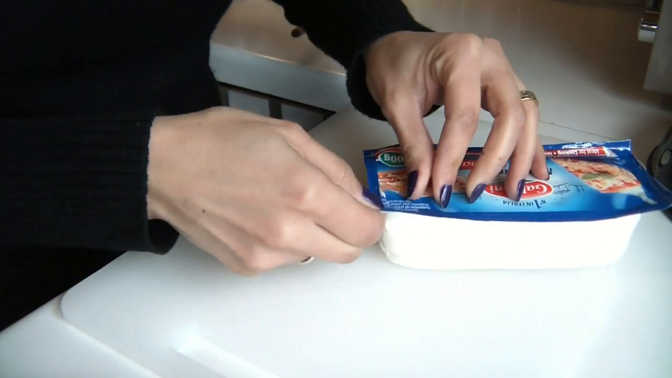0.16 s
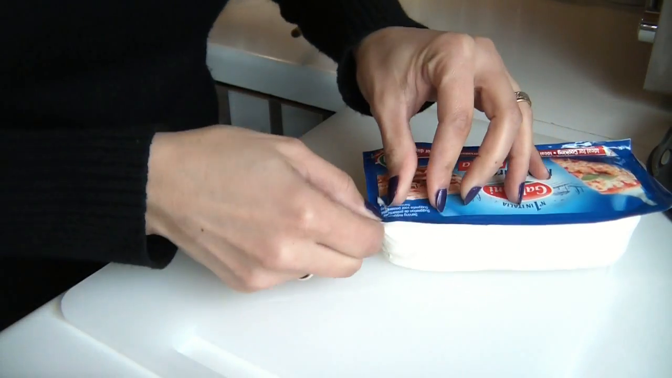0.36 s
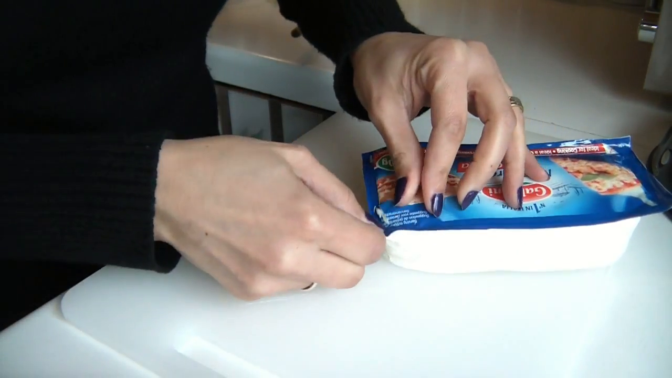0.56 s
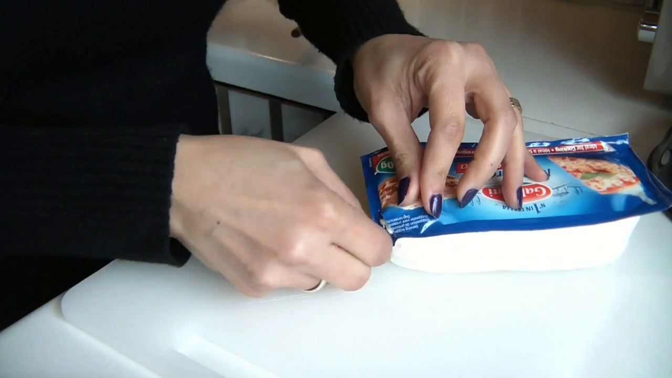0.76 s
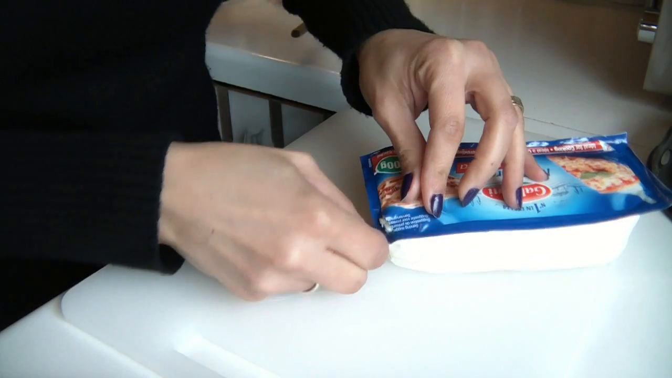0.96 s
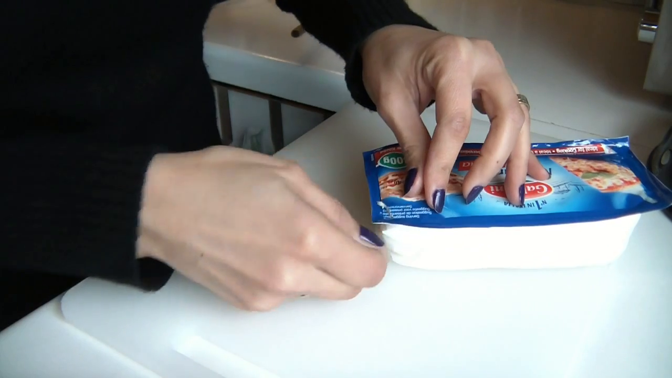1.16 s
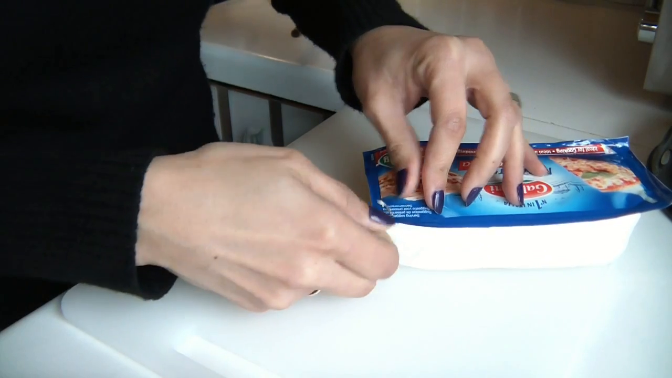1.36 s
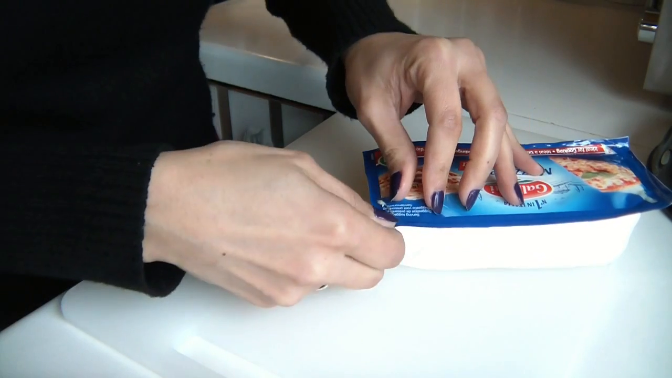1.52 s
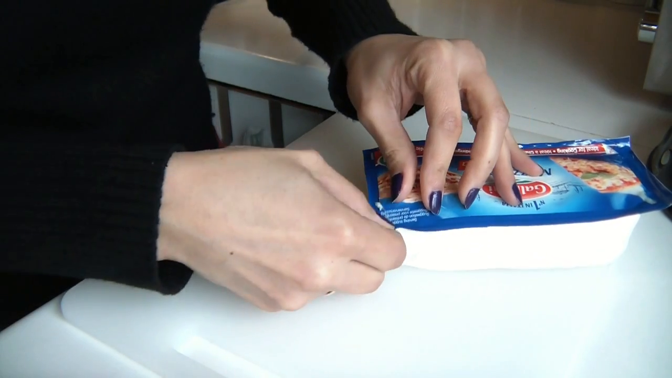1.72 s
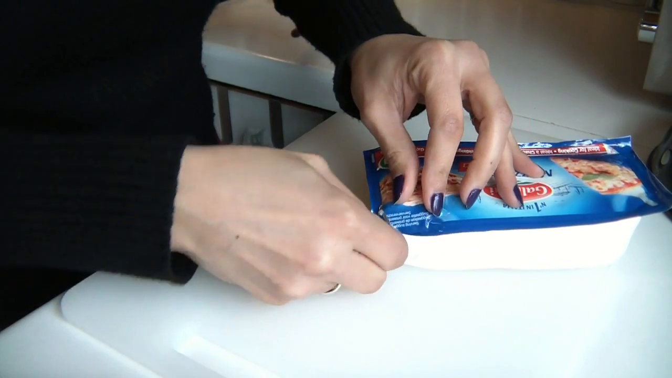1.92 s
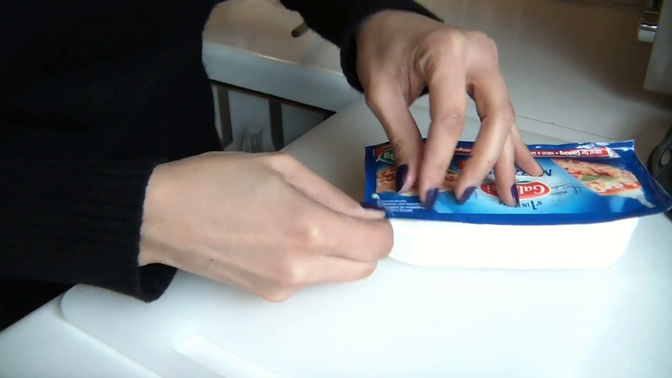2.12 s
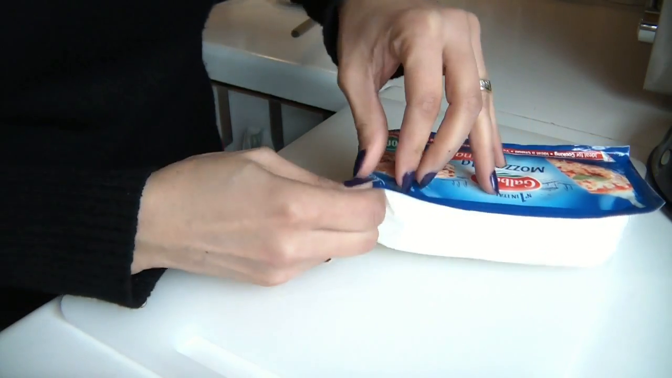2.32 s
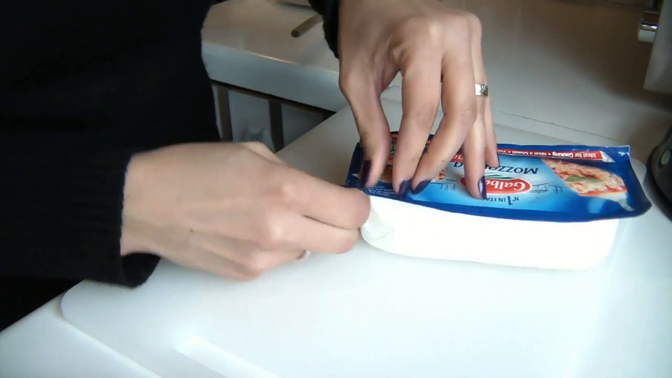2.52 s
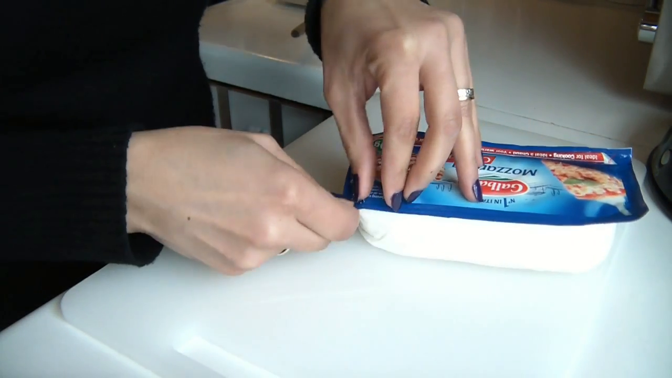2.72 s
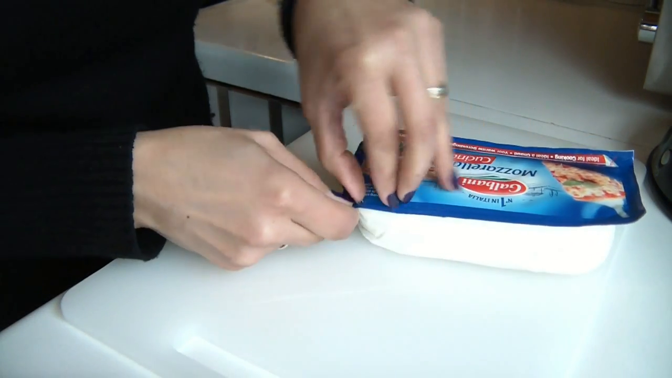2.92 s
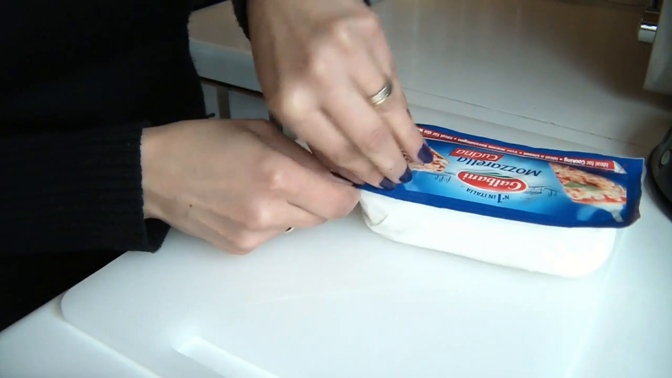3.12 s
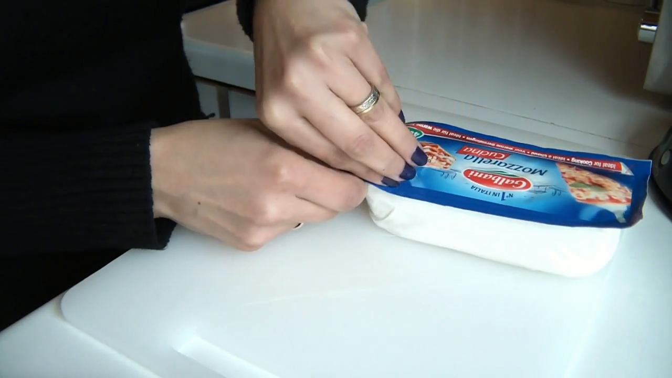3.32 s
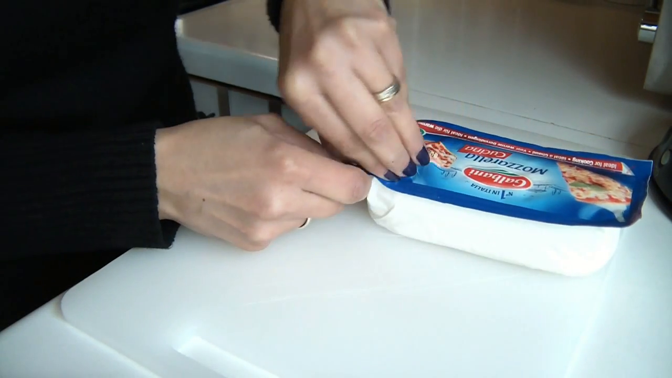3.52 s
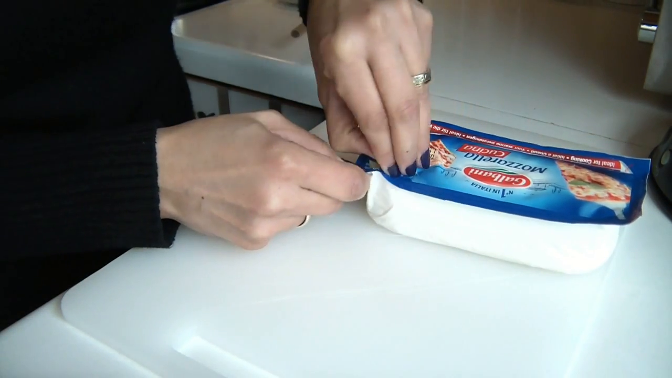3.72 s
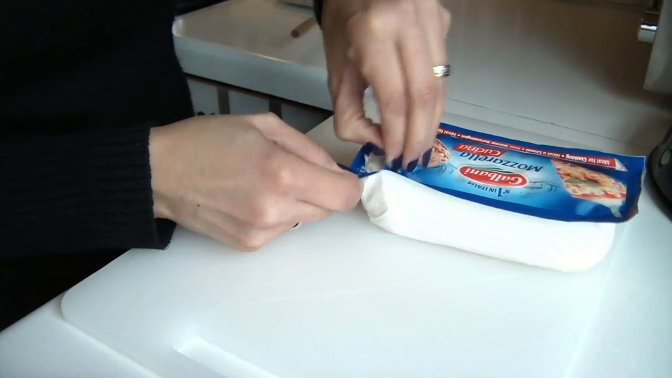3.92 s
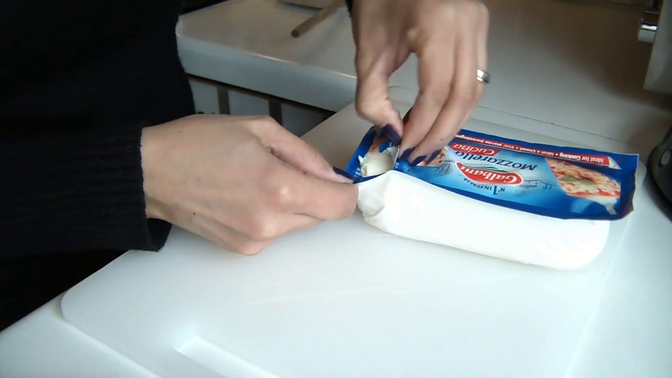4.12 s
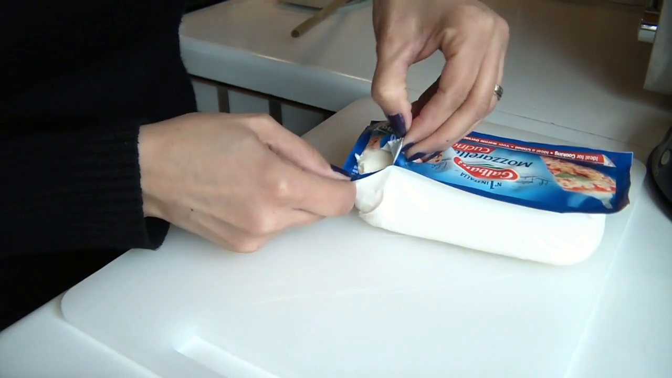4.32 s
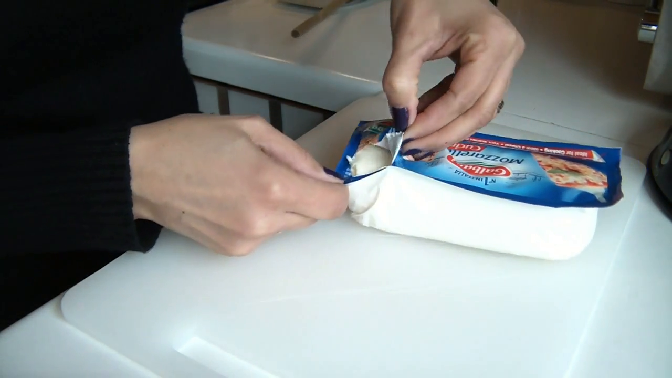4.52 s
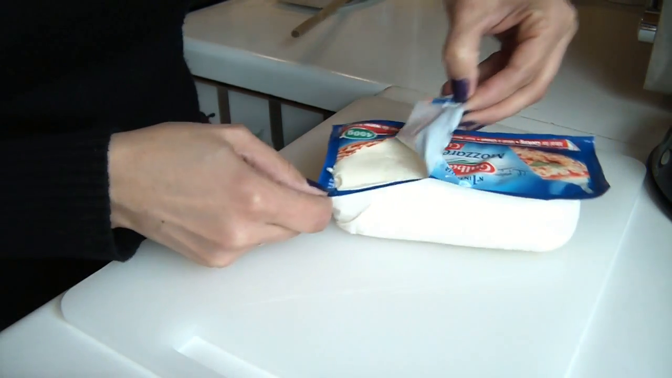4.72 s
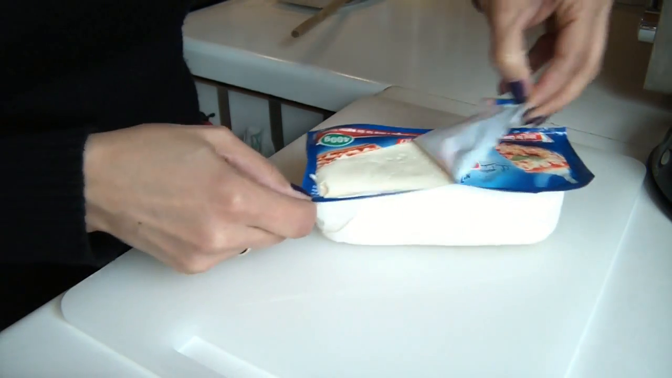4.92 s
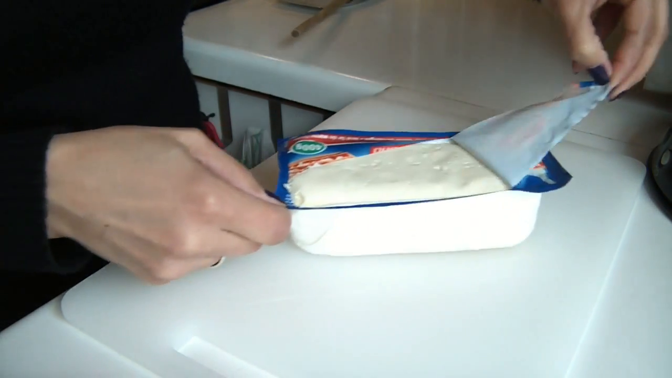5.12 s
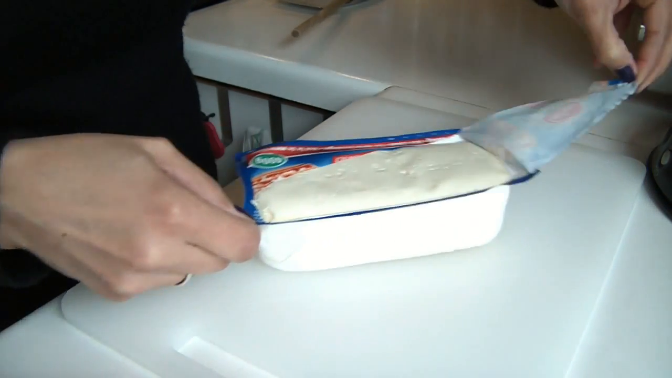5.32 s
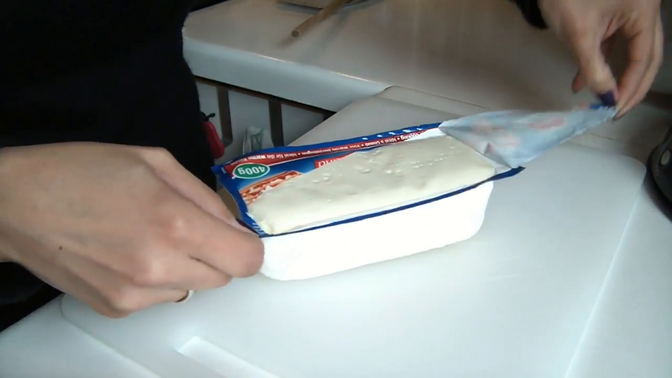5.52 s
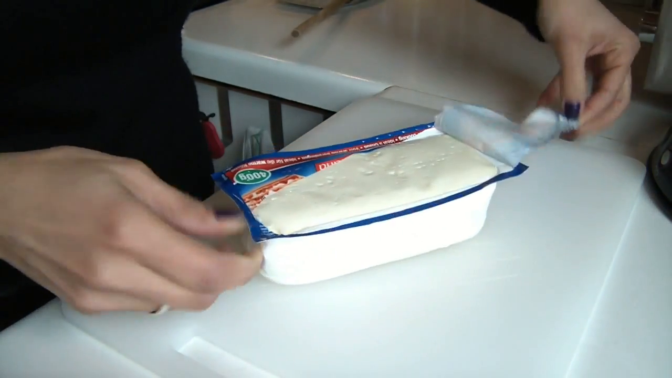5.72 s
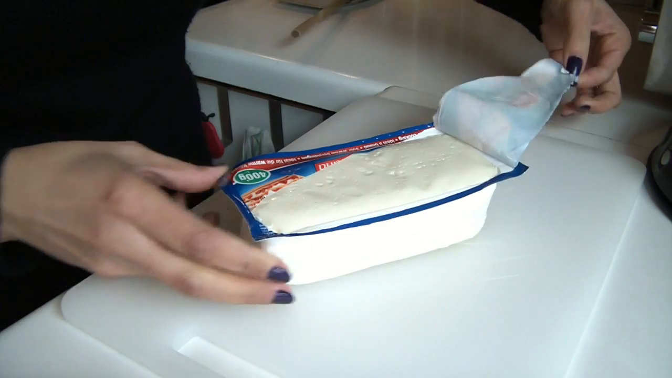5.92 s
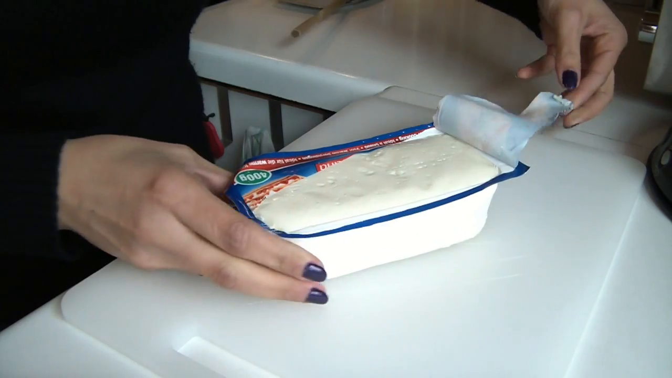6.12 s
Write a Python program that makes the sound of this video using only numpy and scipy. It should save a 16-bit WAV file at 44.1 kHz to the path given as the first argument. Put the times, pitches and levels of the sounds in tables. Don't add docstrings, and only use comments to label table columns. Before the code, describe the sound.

Irregular crisp clicks and tiny rustles of plastic film in a small kitchen, ending in a fast, sharp ripping peel that rings the tub.

```python
import sys
import numpy as np
from scipy import signal
from scipy.io import wavfile
from scipy.ndimage import uniform_filter1d

SR = 44100
rng = np.random.default_rng(int(sys.argv[2]) if len(sys.argv) > 2 else 0)


def nominal_scale(level):
    x = np.asarray(level, float) / 20
    return 10 ** x


def dump(signal):
    limited = np.clip(np.atleast_2d(signal).T, -1, 1)
    pcm = np.round(limited * 32767).astype(np.int16)
    wavfile.write(sys.argv[1], SR, pcm)


N = 271435
SMALL_HZ = 4540

# centre in Hz, energy-to-density offset in dB.
SNAP_PARTS = [(700, 12.5), (2250, 8.5), (11000, 7)]


def evened(x):
    return x / np.sqrt(np.mean(x ** 2) + 1e-20)


def read(points, hz):
    f, value = np.transpose(points)
    return np.interp(np.log(hz + 1), np.log(f + 1), value)


def over_time(points, t):
    return np.interp(t, *np.transpose(points))


def add(mix, s, sound):
    part = mix[round(s * SR):][:len(sound)]
    part += sound[:len(part)]


def causal(points):
    hz = abs(np.fft.fftfreq(1024, 1 / SR))
    log_gain = np.log(nominal_scale(read(points, hz)))
    return np.fft.ifft(np.exp(np.conj(signal.hilbert(log_gain)))).real[:512]


def hush():
    # frequency in Hz, level in dB per Hz.
    noise_spectrum = [(12, -41), (20, 4.5), (74, -8.5), (138, -5.5), (172, -10.5), (337, -16.5),
                      (410, -20.5), (459, -13.5), (642, -14), (698, -15.5), (976, -14.5), (2020, -24),
                      (12400, -26.5), (14700, -26), (16000, -70)]
    # frequency in Hz, correlation (no unit).
    likeness = [(60, 0.99), (180, 0.78), (550, 0.78), (1650, 0.49), (4970, 0.21), (15000, 0.022)]
    # time in seconds, level in dB.
    drone_swell = [(0, -0.5), (3.6, -2), (6.15, -1.4)]
    # frequency in Hz, rms level in dB.
    whines = [(75.4, -62.5), (12209, -67.5), (13270, -73)]
    hop = 256
    frames, hz = N // hop + 5, np.fft.rfftfreq(1024, 1 / SR)
    a, b, c, d, patches = rng.standard_normal((frames, 513, 5)).T
    patches = evened(uniform_filter1d(uniform_filter1d(patches, 8, 0), 14, 1))
    drone_db = over_time(drone_swell, np.arange(frames) * hop / SR)
    low = 1 / (1 + (hz / 1400) ** 4)[:, None]
    same = np.clip(read(likeness, hz), -1, 1)[:, None]
    left = a + 1j * b
    right = same * left + np.sqrt(1 - same ** 2) * (c + 1j * d)
    level_db = read(noise_spectrum, hz)[:, None] + low * (drone_db + 1.95 * patches) + 0.15 * patches
    z = np.array([left, right]) * nominal_scale(level_db)
    out = nominal_scale(-47.5) * evened(signal.istft(z, nperseg=1024, noverlap=768)[1][:, :N])
    t = np.arange(N) / SR
    for f, db in whines:
        wander = np.cumsum(rng.standard_normal(N)) * 0.011
        out += np.sqrt(2) * nominal_scale(db) * np.sin(2 * np.pi * f * t + wander)
    return out


def room():
    # frequency in Hz, t60 in seconds.
    decay = [(300, 0.28), (800, 0.19), (2100, 0.17), (5500, 0.16), (10000, 0.17), (15000, 0.2)]
    tail_db, late_db, late_stretch = 1.13, -11.5, 3.13
    taps = np.zeros((2, SR // 2))
    at = np.arange(140, SR // 2 - 10, 10) + rng.integers(0, 10, (2, (SR // 2 - 141) // 10))
    np.put_along_axis(taps, at, rng.choice([-1., 1.], at.shape), 1)
    hz, t, z = signal.stft(taps, SR, nperseg=128)
    fall_db = -60 * t / read(decay, hz)[:, None]
    gain = nominal_scale(fall_db) + nominal_scale(late_db + fall_db / late_stretch)
    tail = signal.istft(z * gain, SR, nperseg=128)[1]
    return tail * nominal_scale(tail_db) / np.linalg.norm(tail[0])


def kitchen(x):
    echo_s = [.0046, .0058, .0089, .0135, .0195]
    echo_db = [-4, -12, -16, -16.5, -26]
    # time in seconds, level in dB.
    hand_shade = [(0, -1), (3.95, -2), (4.12, 0.5), (6.15, -4)]
    # frequency in Hz, level in dB.
    side_spectrum = [(300, -33), (1000, -13), (2000, -13), (5000, -7), (12000, 2)]
    # frequency in Hz, level in dB.
    wall_colour = [(300, -6), (1000, -5), (2400, -2), (4000, 1), (6200, 0.5), (8500, -5.5), (14500, -6.5),
                   (16000, -44)]
    t = np.arange(N) / SR
    turn = 2 * np.pi * 5.3 * t
    shares = [np.sqrt(2 / 3) * np.cos(turn + k * np.pi / 3) for k in range(3)]
    wet = sum(signal.fftconvolve((x * share)[None], room(), axes=1)[:, :N] for share in shares)
    shaded = x * nominal_scale(over_time(hand_shade, t))
    n = np.arange(96)
    for s, db in zip(echo_s, echo_db):
        ragged = (n == 0) + 0.17 * rng.standard_normal((2, 96)) * np.exp(-n / 184.0)
        echo = signal.oaconvolve(shaded[None], ragged, axes=1)[:, :N]
        add(wet.T, s, nominal_scale(db) * echo.T)
    middle = wet[0]
    side = signal.oaconvolve(wet[1], causal(side_spectrum))[:N]
    stereo = np.array([middle + side, middle - side])
    return signal.oaconvolve(stereo, causal(wall_colour)[None], axes=1)[:, :N]


def ports(x):
    port_hz, port_db, left_db = 6900, -14.5, -0.22
    treble = signal.sosfilt(signal.butter(2, port_hz, "high", fs=SR, output="sos"), x)
    side = nominal_scale(port_db) * np.roll(treble, 3)
    return np.array([x + side, x - side]) * nominal_scale([[left_db], [-left_db]])


def knocks():
    # start in seconds, peak in dB, pitch in Hz.
    knock_rows = [
        (0.8258, -32, 980),
        (0.827, -35, 1090),
        (0.9645, -34, 1010),
        (0.967, -36, 1110),
        (1.7057, -40, 1070),
    ]
    out, t = np.zeros(N), np.arange(6000) / SR
    for s, db, hz in knock_rows:
        envelope = nominal_scale(db - 60 * t / .035) * (1 - np.exp(-t / .003))
        add(out, s, envelope * np.sin(2 * np.pi * hz * t))
    return out


def bumps():
    # start in seconds, level in dB, centre in Hz, t60 in seconds.
    bump_rows = [(1.222, -32.5, 70, 0.13), (1.225, -33, 260, 0.063), (1.222, -22.5, 1300, 0.056),
                 (1.975, -35, 270, 0.066), (2.712, -36, 90, 0.097), (5.148, -27, 310, 0.083),
                 (5.218, -38, 131, 0.078), (5.509, -43, 255, 0.18), (5.84, -40, 230, 0.2),
                 (5.942, -42, 258, 0.11), (5.872, -35, 228, 0.056)]
    span_ratio = 1.33
    out, t = np.zeros(N), np.arange(6000) / SR
    for (s, db, hz, t60), noise in zip(bump_rows, rng.standard_normal((len(bump_rows), 6000))):
        band = signal.butter(2, [hz / span_ratio, hz * span_ratio], "band", fs=SR, output="sos")
        envelope = nominal_scale(db - 60 * t / t60) * (1 - np.exp(-t / 0.0011))
        add(out, s, envelope * evened(signal.sosfilt(band, noise)))
    return out


def tub():
    # pitch in Hz, level in dB, t60 in seconds.
    modes = [(265, -13.5, 0.12), (454, -3, 0.06), (557, -2.5, 0.087), (844, -3, 0.048), (1184, -13, 0.046)]
    # start in seconds, peak in dB, share of the deepest mode in dB.
    tugs = [(4.7847, -25.5, -9), (4.8265, -30, -8), (4.8373, -30, -10), (4.845, -34, -8), (4.873, -26, -3),
            (4.8894, -24, -9), (4.899, -28, -4), (4.918, -24, -4), (4.9267, -33, -5), (4.94, -33, -10),
            (4.949, -16, -4), (5.004, -33.5, -4), (5.066, -31, -11), (5.0859, -26, -9), (5.1007, -16, -24),
            (5.12, -21, -9), (5.1479, -9.5, 8), (5.216, -22, 6), (5.246, -18, -7)]
    tug_db, spot_db = -9, 2.0
    out, t = np.zeros(N), np.arange(4096) / SR
    chance = rng.standard_normal(size=(64, len(modes)))
    hz, mode_db, t60 = np.transpose(modes)[:, :, None]
    for (s, db, deep_db), spot in zip(tugs, chance):
        reach_db = mode_db + spot_db * spot[:, None] + deep_db * (hz == hz.min())
        rings = nominal_scale(tug_db + db + reach_db - 60 * t / t60) * np.sin(2 * np.pi * hz * t)
        add(out, s, rings.sum(axis=0))
    return out


def ring(hz, spread, t60, chance):
    t = np.arange(1024) / SR
    modes = np.sin(2 * np.pi * np.outer(hz * np.exp(spread * chance), t)).sum(axis=0)
    sound = modes * nominal_scale(-60 * t / t60) * (1 - np.exp(-t * hz * 2.3))
    return sound / np.linalg.norm(sound)


def ticks(lo_hz, hi_hz, t60):
    ticks_per_s, spread_db = 1600, 3
    clumps = nominal_scale(5.5 * evened(uniform_filter1d(rng.standard_normal(N), 400)))
    size = nominal_scale(spread_db * np.minimum(rng.exponential(1, N), 4))
    size = size * (rng.random(N) < ticks_per_s / SR)
    kind = rng.integers(0, 8, N)
    rain = np.zeros(N)
    for k, hz in enumerate(np.geomspace(lo_hz, hi_hz, num=8)):
        tick = ring(hz, 0.072, t60, rng.standard_normal(3))
        rain += signal.oaconvolve(size * clumps * (kind == k), tick)[:N]
    return rain / np.sqrt(uniform_filter1d(rain ** 2, 3000) + 1e-9)


def rustle():
    # start in seconds, length in seconds, effort in dB, tub pressure in dB, fizz in dB.
    builds = [
        (.88, .13, -48, -18, 2),
        (2.326, .13, -56.5, 9.5, -1),
        (4.1, .097, -55, 4, 3),
        (5.05, .17, -37, -6, -12),
        (6.08, .073, -50, -.5, .5),
    ]
    eases = [
        (1.06, .16, -65, 2, 10),
        (1.66, .08, -56.5, -6, -2),
        (2.05, .276, -53, -7, -5),
        (2.68, .14, -51, -1, -1.5),
        (4.875, .115, -41, 2.5, -11),
        (5.395, .14, -39.5, -7, -2),
        (2.53, .03, -42, -14, -14),
        (3.64, .045, -47, -10, -2),
    ]
    rubs = [
        (.72, .148, -55, -12, 6),
        (4.8, .075, -39, -6, -9),
        (5.84, .098, -56, 13, -12),
        (5.53, .135, -42, -12, -3.5),
        (1.172, .03, -47, -12, -2),
        (5.221, .038, -16.5, -12, -8),
    ]
    scrapes = [
        (1.21, .034, -25, -9, -8),
        (5.938, .025, -43.5, 10.5, -18),
        (5.495, .041, -34, -7.5, -6),
        (4.815, .045, -40, -5, -12),
        (5.185, .04, -33, -7, -6),
    ]
    rustle_db = -3
    t, effort = np.arange(N) / SR, np.zeros((3, N))
    # table, change of effort over a stretch in dB, taper share
    for table, change_db, taper in ((builds, 9.5, .15), (eases, -6.5, .15), (rubs, 0, .2), (scrapes, 0, 1)):
        for s, length, db, tub_db, fizz_db in table:
            span = (t >= s) & (t < s + length)
            slope_db = change_db * ((t[span] - s) / length - .5)
            shape = nominal_scale(slope_db) * signal.windows.tukey(span.sum(), taper)
            layer_db = db + rustle_db + np.array([0, tub_db, fizz_db])
            effort[:, span] += np.outer(nominal_scale(layer_db), shape)
    film, grumble, fizz = ticks(1860, 6600, 0.0028), ticks(430, 1590, 0.014), ticks(6300, 13700, 0.00062)
    return (effort * [film, grumble, fizz]).sum(axis=0)


def blips():
    # start in seconds, peak in dB, pitch in Hz, t60 in seconds.
    patch_rows = [(.0183, -7.5, 4780, 0.0051), (.0183, -19, 1500, .025), (0.018, -31, 10100, 0.0074),
                  (.377, -28.5, 450, 0.017), (2.5316, -22.5, 1450, 0.006), (2.531, -27, 3150, 0.014),
                  (2.537, -31, 1800, .012), (2.6282, -21.5, 1680, 0.015), (2.6285, -29, 3240, .01),
                  (2.629, -28, 5060, 0.015), (2.634, -30, 1580, .015), (2.46, -17, 4410, .01),
                  (2.2792, -12, 2900, .007), (2.4554, -13, 2500, .007), (3.6908, -4.5, 10600, 0.0044),
                  (3.6908, -13, 9300, .005), (3.722, -29, 1790, .01), (3.733, -31, 1000, 0.0098),
                  (3.744, -31, 1150, .008), (3.678, -37, 900, 0.011), (4.187, -5, 2900, .007),
                  (4.1915, -7, 3400, .008), (4.2, -18, 2600, .01), (4.207, -16, 3000, .008),
                  (4.1875, -7, 2050, .01), (4.187, -12, 760, .02), (4.192, -13, 1900, 0.011),
                  (4.188, -9, 4500, .007), (4.187, -8, 1500, 0.005), (4.187, -16, 12400, 0.0065),
                  (4.8885, -25, 990, .012), (4.898, -24, 900, .015), (4.908, -29, 900, .012),
                  (4.9185, -30, 8900, 0.0074), (4.9189, -20, 895, .012), (4.927, -19, 795, 0.014),
                  (4.949, -9.5, 2896, 0.016), (4.949, -11, 10740, .007), (5.1008, -16.5, 2500, .015),
                  (5.121, -15, 2700, .008), (5.125, -17, 2100, .009), (5.246, -13, 1000, .012),
                  (5.235, -15, 1100, .012), (5.229, -9, 5200, .008), (5.148, -11, 2060, .014),
                  (5.1536, -15, 3000, .018), (5.217, -6, 2320, .02), (5.2221, -10, 2410, 0.024)]
    out, t = np.zeros(N), np.arange(2048) / SR
    for s, db, hz, t60 in patch_rows:
        pair = np.sin(2 * np.pi * hz * t) + 0.69 * np.sin(2 * np.pi * hz * 1.115 * t)
        add(out, s, nominal_scale(db - 60 * t / t60) * pair * (1 - np.exp(-t * hz * 1.76)))
    return out


def folds():
    # start in seconds, strength in dB,
    # tilt of wide fold over fizz in dB, crease ring in dB, crease pitch in Hz.
    picks = [(0.0181, -20, 16, 18, 4200), (0.3622, -16, 11, 10.5, 4750), (0.3770, -15.5, 24.5, 17, 4800),
             (0.6834, -22, 0, 14, 5400), (0.7184, -17, -6.5, 11, 6000), (1.218, -22.5, 17, 14, 3630),
             (1.2242, -13.5, 16, 13, 3500), (2.1721, -20.5, -14, 15, 5000), (2.2785, -6.5, 14, 9, 3260),
             (2.3249, -15, -12, 6, 4660), (2.4527, -18, -17, 10, 4470), (2.4548, -11, 27.5, 6.5, 4560),
             (2.46, -23, 13, 22.5, 4500), (2.2838, -23, 3, 19, 5430), (2.332, -24, -17, 5, 6000),
             (2.447, -28, 23, 1, 2980), (2.6286, -22.5, 7, 7, 5100), (2.633, -31.5, 0, 15.5, 5300),
             (2.8094, -5, -10, 13.5, 5070), (3.6908, -13, -12, 21, 5500), (3.7084, -28, 29, 8, 5530),
             (3.7439, -32, 27, 5, 5030), (3.8079, -19, 10, 13, 5200), (4.187, 0, 8, 11, 3300),
             (4.6203, -7, 3, 11.5, 3570)]
    # start in seconds, strength, tilt and ring in dB, pitch in Hz.
    peel = [(4.873, -20, -3, 6, 4300), (4.8857, -21, 24, 13, 3600), (4.8887, -16.5, 20, 11, 4300),
            (4.9139, -23, 7, 11, 4080), (4.918, -24, -4, 20, 3320), (4.9447, -21, 12, 16, 4000),
            (4.949, -1.5, 5.5, 14.5, 3930), (4.8955, -26, 14, 13, 4500), (4.9275, -22, 13, 13, 3500),
            (5.2554, -15, 1, 10, 5200), (5.207, -14, 25, 1, 3000), (5.26, -17, 12, 8, 2800),
            (5.9442, -28.5, 22, 5, 4700), (5.946, -27, 24, 6, 2900), (5.0857, -28, 21, 20.5, 2960),
            (5.1008, -9.5, 20, 10.5, 3440), (5.1031, -18, -1, 14, 3600), (5.116, -15.5, -10, 10, 3220),
            (5.1204, -9.5, 9, 7, 3450), (5.1479, 2.5, 16.5, 8.5, 4430), (5.192, -20, -13, 5, 5000),
            (5.2164, 6.5, 10.5, 13.5, 5540), (5.219, 0.5, -10.5, 13, 4800), (5.229, -12, -13, 10, 4800),
            (5.2434, 2.5, -2, 7.5, 4700), (5.247, -7, -13, -16, 4300), (5.4, -17.5, -26, 6, 5400),
            (5.405, -18.5, -32, 4, 5400), (5.5126, -18, 7, 15, 4050), (5.5153, -11, 25, 9.5, 4100),
            (5.547, -23, 32, -21, 3600)]
    # start in seconds, strength in dB, tilt of wide fold over fizz in dB.
    creases = [(.2604, -26.5, -9.5), (.4118, -27, -3.5), (.7829, -25, -7), (.8015, -19.5, -1),
               (.884, -27.5, 1), (.9134, -22, 12), (.9243, -26.5, 2), (.9321, -26, 7), (.9395, -36, 12),
               (.9484, -27.5, 1), (.9698, -22.5, 1.5), (.9915, -22, -12), (1.0263, -31, -13),
               (1.088, -26.5, 0), (1.133, -27, 5), (.994, -26, 7), (1.8942, -18.5, 13), (1.9428, -22.5, 6),
               (2.0884, -35, -0.5), (2.0935, -38, 4), (2.112, -38, -2), (2.142, -30, 3), (2.2078, -26, 20),
               (2.2127, -26, 14), (2.369, -25, 15), (4.318, -34, 1), (4.351, -36, -9), (4.569, -38, -10),
               (4.8257, -31, 13), (4.8375, -34, 16), (5.756, -41, 8), (6.105, -27, 11),
               (2.1298, -25.5, 5.5), (2.2514, -31, -8), (2.353, -20, 6.5), (2.412, -25, 14),
               (2.5293, -23, 1), (2.7071, -34, -8), (2.7282, -19.5, 5.5), (2.7959, -19, -2.5),
               (2.94, -27.5, 16), (2.9835, -27, 10),
               (3.1188, -30, -17), (3.618, -29, 5), (3.6394, -24, -4.5), (3.856, -26, 3.5), (3.964, -40, -9),
              (4.1157, -19.5, 4.5), (4.146, -21.5, 0), (4.1635, -22, 5), (4.5051, -33, -12),
              (4.577, -30, 10), (4.786, -26, 1), (5.076, -25, 3), (5.418, -19, -2), (5.4266, -16, -17),
              (5.4615, -17.5, 0.5), (5.4906, -21, 4), (5.593, -28, -13), (5.7238, -32.5, 5),
              (5.787, -33, -1.5), (5.8928, -27, 25), (6.0597, -24, 21)]
    crumples = [(.3971, -20, 1), (.5754, -19, -4.5), (.7731, -18, -11), (.7929, -22, -6), (.8449, -26, -5),
                (.9553, -23, 9), (.9822, -23, 3), (1.0998, -24, 1), (1.418, -27, 20), (1.9134, -19.5, 13),
                (1.9718, -14, 5), (2.041, -31, 5), (2.1051, -24, -5.5), (2.2227, -29, 21),
                (2.3115, -23, -13), (2.3927, -29, 16), (2.402, -21.5, -1.5), (2.4325, -16, -4.5),
                (2.7202, -18, 3), (2.7467, -25, -3.5), (3.5689, -18.5, -0.5), (3.6702, -17.5, 1.5),
                (4.3908, -19.5, 1.5), (4.648, -22, 20), (4.7222, -11, 16),
                (4.766, -26, -1), (4.8434, -25, 19), (4.8576, -28, -1), (5.065, -21, 16), (5.1362, -14, -17),
            (5.1395, -9, -14), (5.402, -14.5, -26), (5.4435, -19, -12), (5.4711, -26, -4),
            (5.8424, -28, 26), (5.864, -38, 22), (5.9405, -21, 34)]
    taut_db, slack_db = 11.5, 5
    hz_fall_per_db = 0.15
    small = []
    for table, ring_db in ((creases, taut_db), (crumples, slack_db)):
        for s, db, tilt in table:
            small.append((s, db, tilt, ring_db, SMALL_HZ * np.exp(-hz_fall_per_db * tilt)))
    return picks + peel + small


def snap_rows():
    # start in seconds, level in dB, pitch in Hz.
    thuds = [(.0183, -0.5, 870), (.3769, -8.5, 795), (.8271, -20, 900), (1.2243, -8, 1100),
             (2.2228, -16, 795), (5.1204, -4, 450), (2.353, -15, 600), (2.402, -17, 600),
             (3.8078, -14.5, 820), (2.7071, -15, 495), (2.7282, -22, 600), (3.6394, -17, 696),
             (3.6907, -27, 1300), (3.7097, -7.5, 700), (4.187, 2, 1060), (4.6201, -9, 640),
             (4.7848, -9.5, 600), (4.873, -11, 700), (4.8866, -6.5, 790), (4.9135, -6, 500),
             (4.949, 5.5, 485), (5.076, -12, 450), (5.0855, -6, 450), (5.1015, -2, 450), (5.1479, 6, 476),
             (5.2193, -2, 1140), (5.2455, 0.5, 1020), (5.4711, -12, 600), (5.8424, -14.5, 750),
             (5.864, -17, 700), (3.56, -21, 990), (3.575, -22, 1100), (3.618, -22.5, 1190),
             (2.865, -17, 696), (2.94, -20, 890), (.377, -20, 400), (2.5315, -15, 800)]
    tub_db = -12
    fall_db = -13
    rows = []
    for s, db, tilt, ring_db, hz in folds():
        fold_db, fizz_db = db + tilt / 2, db - tilt / 2
        rows.append((s, fold_db + tub_db, SNAP_PARTS[0][0], fold_db, db + ring_db, hz, fizz_db))
    for s, db, hz in thuds:
        rows.append((s, db, hz, db + fall_db, db + 2 * fall_db, SMALL_HZ, db + 3 * fall_db))
    return rows


def snaps():
    crease_gain_db, skirt_ratio, skirt_db = 4.5, 1.387, -6
    face_db, pop_t60_s = 2.0, 0.012
    out, t = np.zeros((N, 2)), np.arange(192) / SR
    (_, low_offset), (mid, mid_offset), (top, top_offset) = SNAP_PARTS
    band = signal.butter(1, [1300, 8000], "band", fs=SR)
    shiver = signal.lfilter(*band, rng.standard_normal(size=(256, 192)))
    for (s, thud_db, low, fold_db, crease_db, hz, fizz_db), noise in zip(snap_rows(), shiver):
        sign = np.sign(noise[0])
        pop = (0.76 * sign * (t == 0) + 0.19 * noise) * nominal_scale(face_db - 60 * t / pop_t60_s)
        low_db, top_db = thud_db + low_offset, fizz_db + top_offset
        hump_db = crease_db + crease_gain_db
        colour = causal([
            (low / 6.9, low_db - 45.5), (low, low_db), (mid, fold_db + mid_offset),
            (max(hz / skirt_ratio, mid + 200), max(hump_db + skirt_db, fold_db + 3.0)),
            (hz, hump_db), (hz * skirt_ratio, hump_db + skirt_db),
            (top, top_db), (15000, top_db - 7.5), (16300, top_db - 29)])
        add(out, s, np.transpose([np.convolve(pop, colour)[:512], sign * colour]))
    return out.T


def scene():
    # time in seconds, level in dB.
    glare_rows = [(0, -1.5), (3.5, -3), (3.95, -4), (4.12, -1.5), (5.0, 2), (5.3, -3.5), (6.15, 4)]
    glare_hz = 7550
    rustle_gain, blip_gain, knock_gain = nominal_scale([[0], [-4]]), nominal_scale([[0], [-8]]), nominal_scale([[0], [-6.5]])
    near, spread = (snaps() + rustle() * rustle_gain + blips() * blip_gain
                    + (knocks() + bumps() + tub()) * knock_gain)
    treble = signal.filtfilt(*signal.butter(2, glare_hz, "high", fs=SR), spread)
    glare = nominal_scale(over_time(glare_rows, np.arange(N) / SR))
    return ports(near) + kitchen(spread + (glare - 1) * treble) + hush()


def low_pass(x):
    return signal.sosfilt(signal.butter(12, 16620, fs=SR, output="sos"), x)


def record(dry):
    overload, coupling_hz, edge_hz = .8, 450, 16300
    excess = dry - np.clip(dry, -overload, overload)
    held = dry - signal.filtfilt(*signal.butter(2, coupling_hz, "high", fs=SR), excess)
    edge = signal.firwin(255, edge_hz, window=("kaiser", 9), fs=SR)
    return low_pass(signal.oaconvolve(held, edge[None], "same"))


dry = scene()
out = record(dry)
dump(out)
```